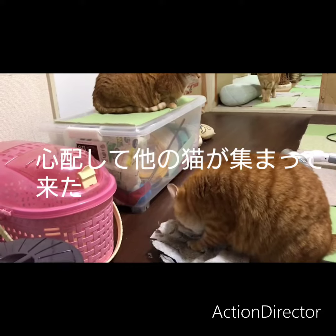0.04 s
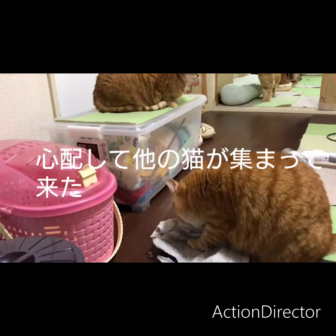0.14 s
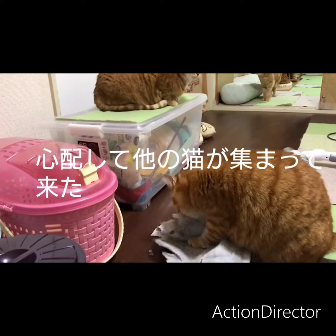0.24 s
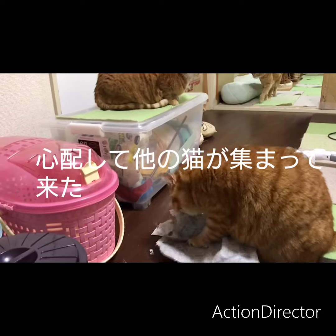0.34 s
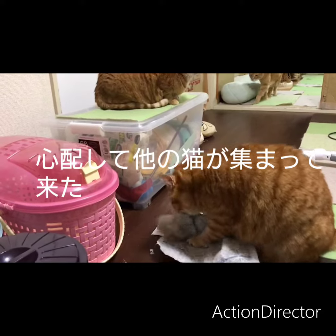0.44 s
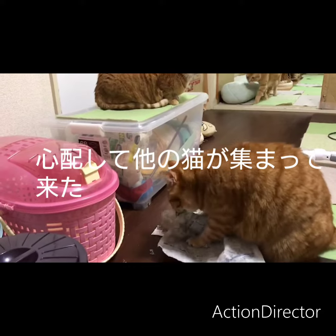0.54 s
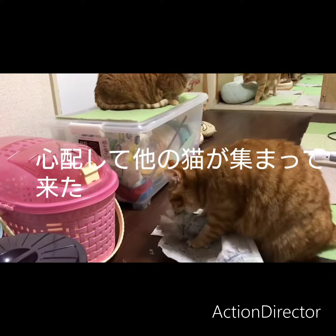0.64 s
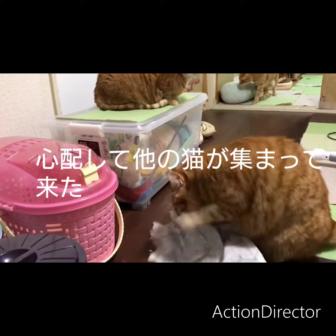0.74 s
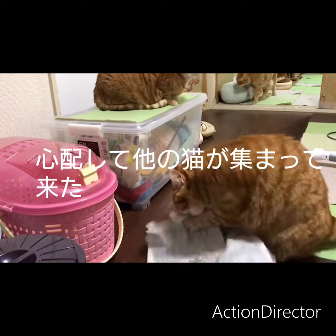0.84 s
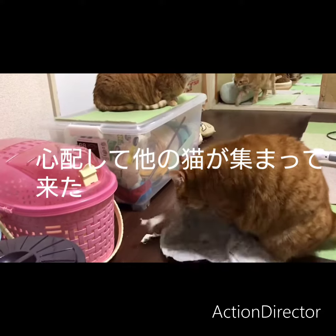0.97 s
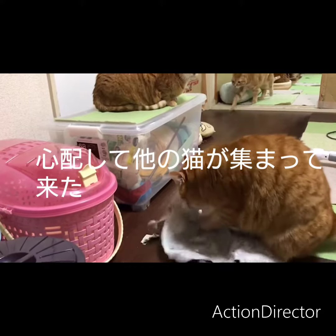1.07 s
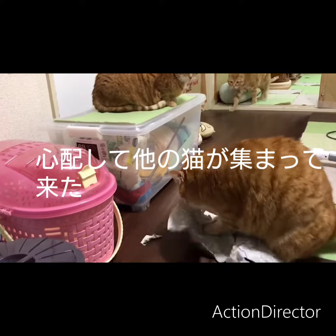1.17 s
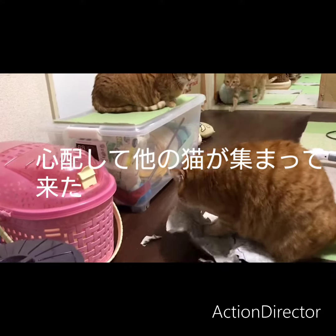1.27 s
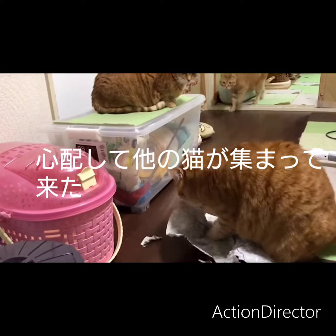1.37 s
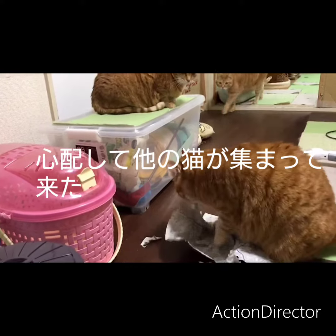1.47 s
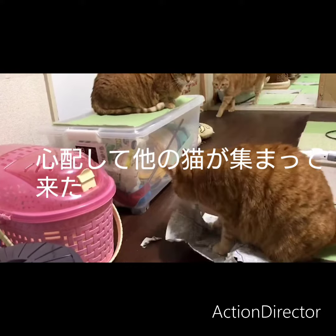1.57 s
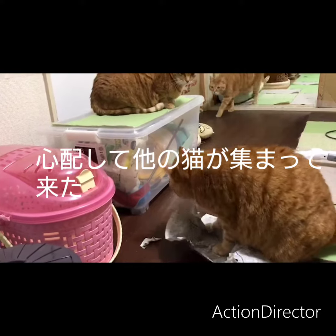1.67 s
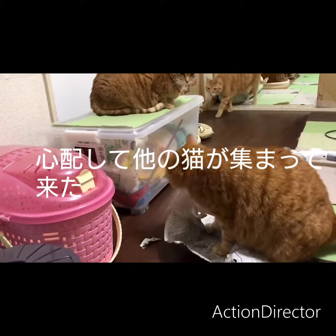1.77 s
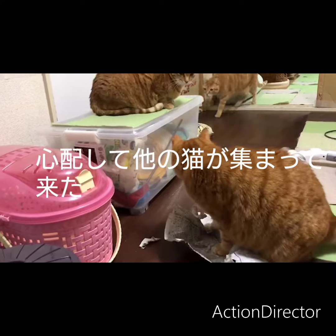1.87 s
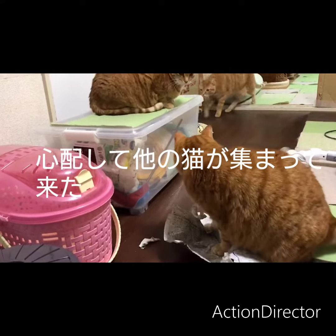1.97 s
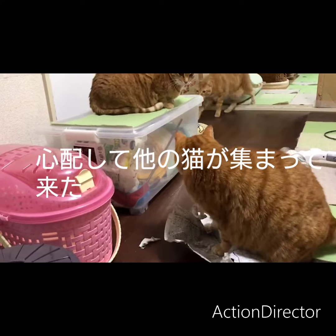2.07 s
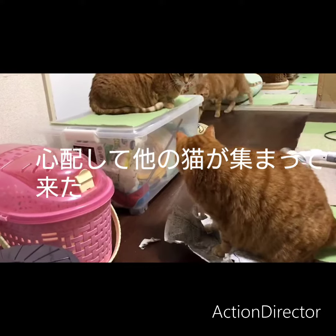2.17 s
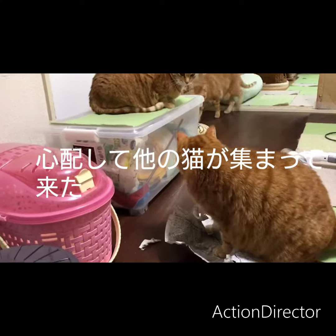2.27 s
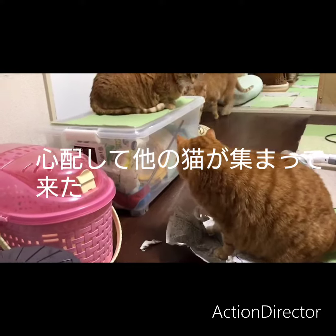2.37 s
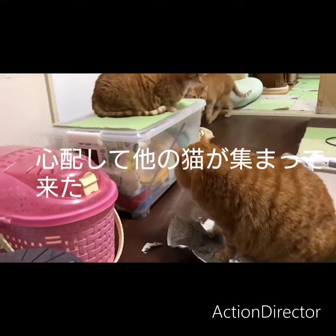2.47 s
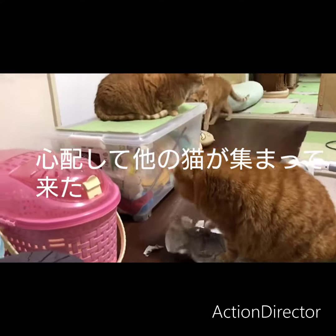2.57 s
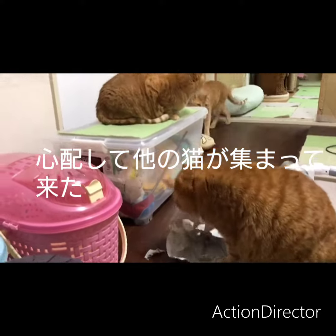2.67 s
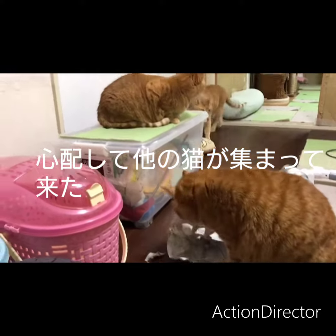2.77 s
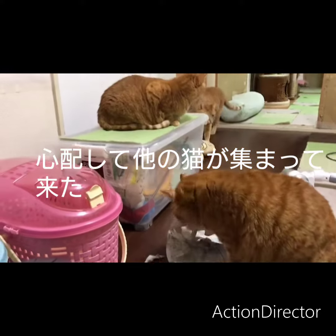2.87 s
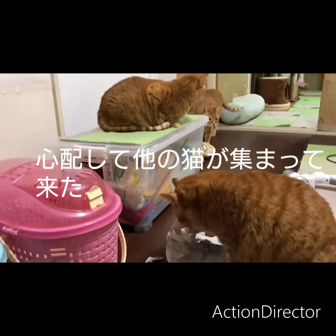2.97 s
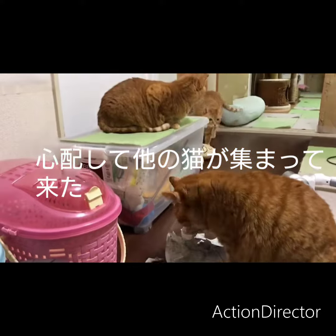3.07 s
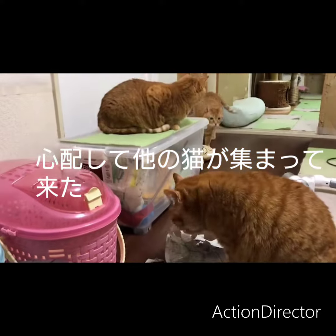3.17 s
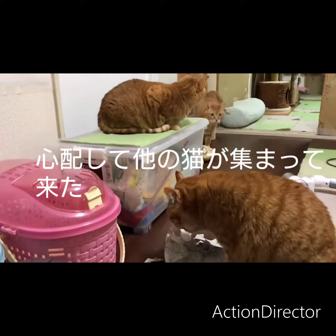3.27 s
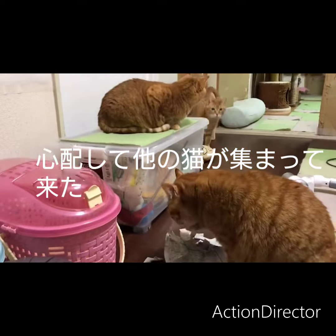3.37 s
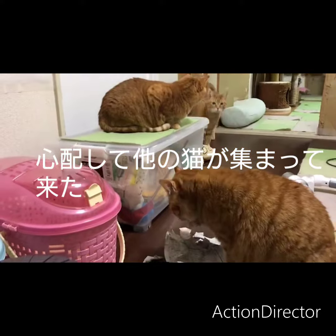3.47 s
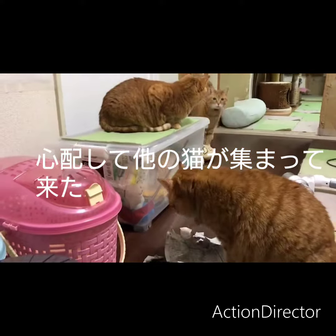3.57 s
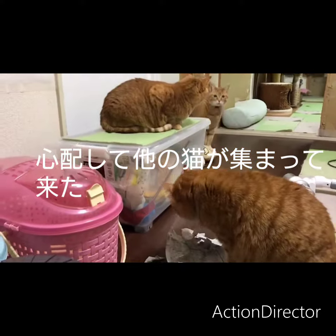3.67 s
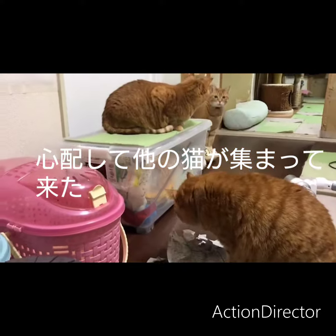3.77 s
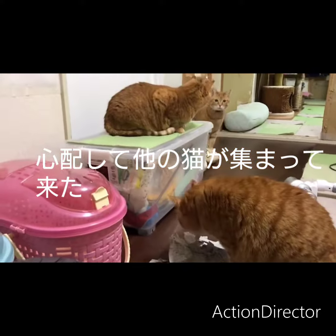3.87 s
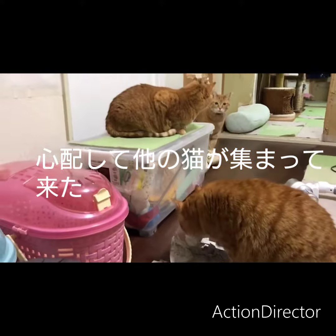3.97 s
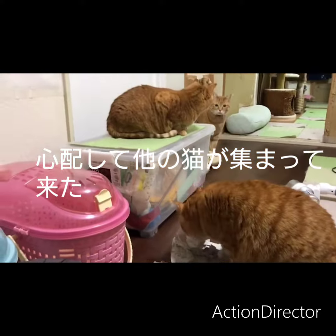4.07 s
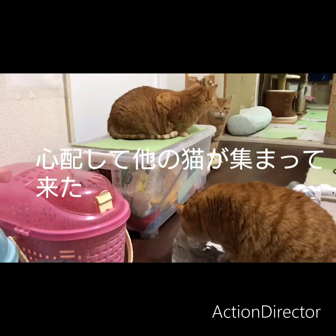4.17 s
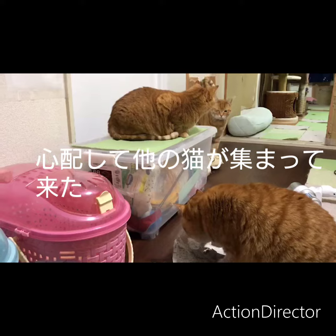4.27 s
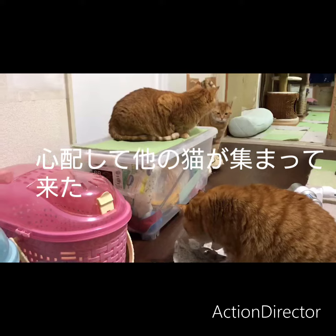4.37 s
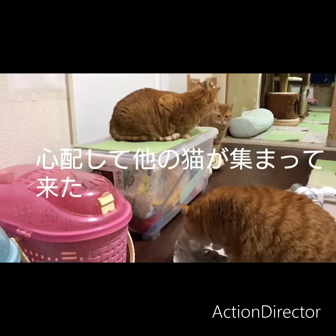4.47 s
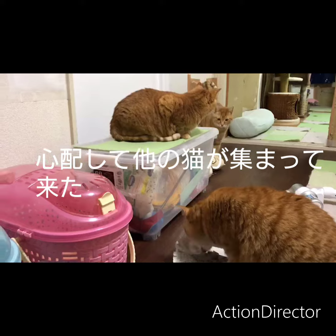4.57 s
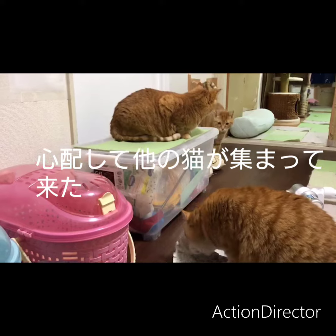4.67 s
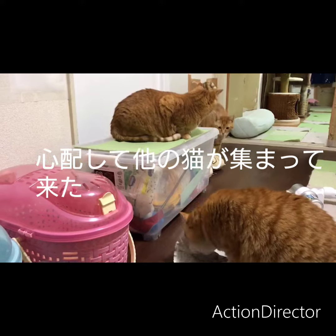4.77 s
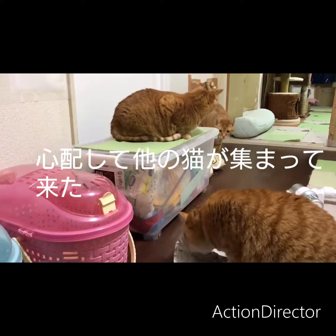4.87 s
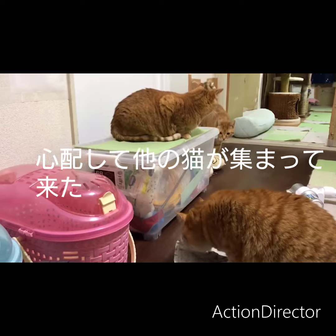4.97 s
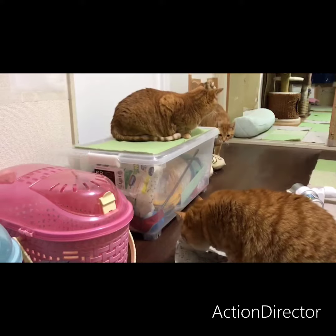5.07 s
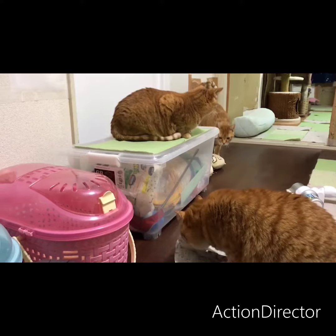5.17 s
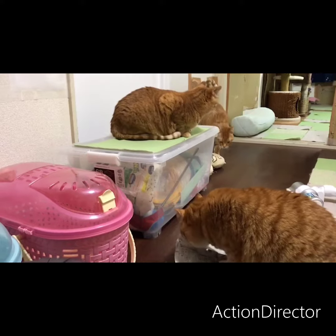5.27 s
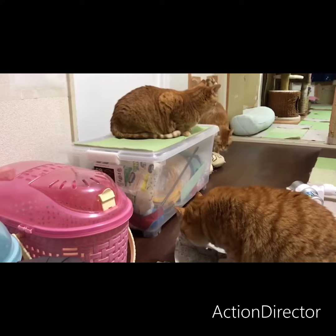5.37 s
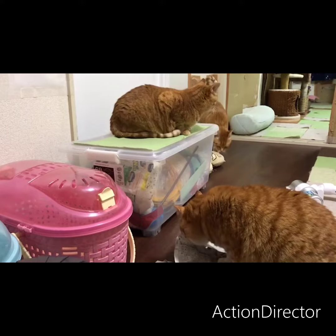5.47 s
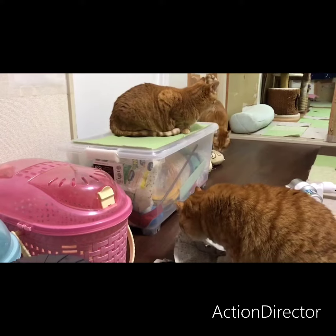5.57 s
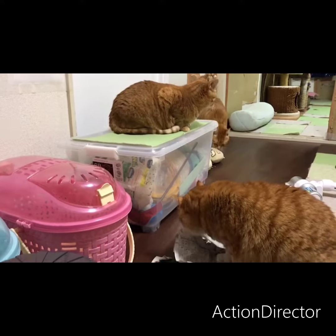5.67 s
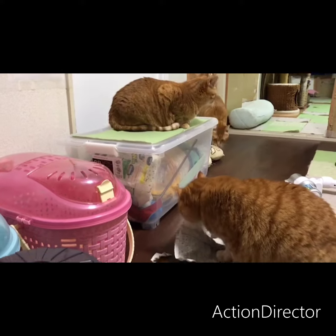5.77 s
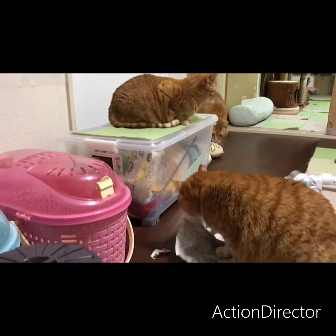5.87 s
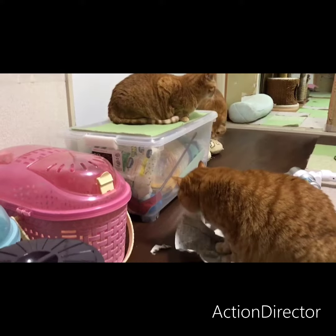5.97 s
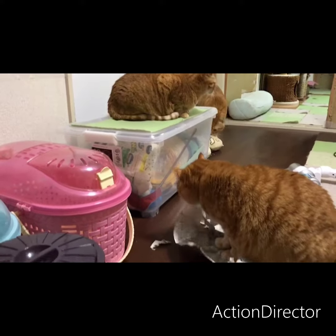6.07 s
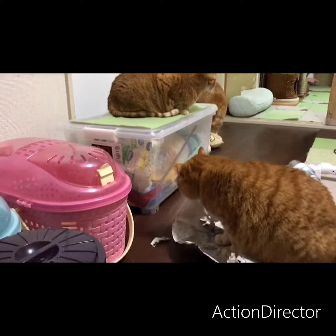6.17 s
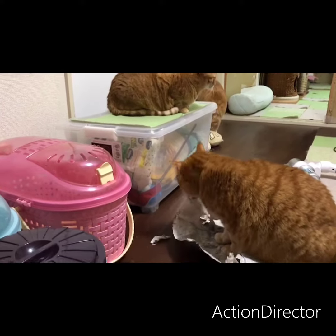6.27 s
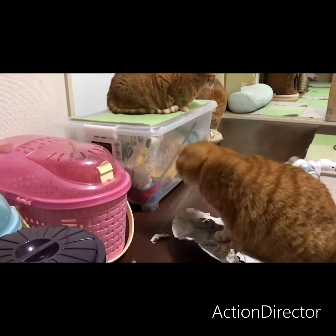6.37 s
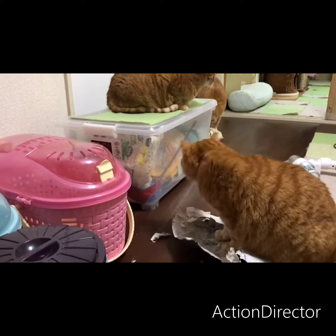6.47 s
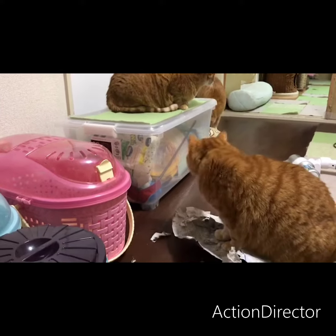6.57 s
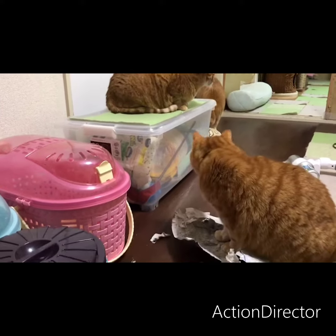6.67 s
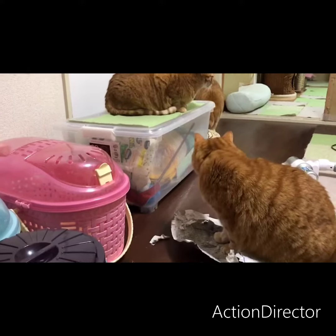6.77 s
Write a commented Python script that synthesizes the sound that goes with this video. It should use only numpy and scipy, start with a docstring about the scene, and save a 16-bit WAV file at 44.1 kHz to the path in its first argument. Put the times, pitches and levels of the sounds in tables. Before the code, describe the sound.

Newspaper rips and crumples sharply in uneven bursts close by, then quiet shuffling, soft paw thuds and two small clicks in a small room.

```python
"""A newspaper rips and crumples at once, torn by a cat on the wooden floor of a small room.
Then the cat noses at the sheet and shuffles it about, with soft paw thuds and two sharp clicks.
Clumped clicks and noise make the tearing and sliding; smeared impulses make single crease snaps.
Noise through resonances makes the thuds, damped resonances make the clicks.
Short noise tails answer as the room, over a faint rumble and hiss."""
import sys
import numpy as np
from scipy import signal
from scipy.fft import irfft
from scipy.io import wavfile
from scipy.ndimage import uniform_filter1d

SR = 44100
rng = np.random.default_rng(int(sys.argv[2]) if len(sys.argv) > 2 else 0)


def bounce(signal):
    """Save signal as a 16-bit WAV file at the path given by the first command-line argument."""
    frames = np.transpose(np.atleast_2d(signal))
    limited = np.clip(frames, -1, 1)
    pcm = np.round(limited * 32767).astype(np.int16)
    wavfile.write(sys.argv[1], SR, pcm)


N = 300762   # length in samples

# Pulls that rip the sheet: start t/s, swell t/s, hold t/s, relative crackle level/dB,
# flapping re crackle level/dB, fibre hiss re crackle level/dB
RIPS = [(0, 0.001, 0.03, -52, -8, -5), (.05, .02, 0.099, -60, -4, 2), (.217, 0.044, 0.037, -45, 2, -0.5),
        (.33, 0.017, 0.018, -45.5, 7.5, 3.5), (.38, 0.068, 0.048, -43, 0.5, 5),
        (.48, 0.034, 0.035, -36, -4, 2.5), (.56, .02, 0.039, -40.5, -4, 1),
        (.65, 0.086, 0.042, -45, -13, 0.5), (.84, 0.051, 0.033, -38.5, -6, 1),
        (.94, 0.025, 0.13, -48.5, -4.5, -2), (1.06, 0.036, 0.051, -36, -6.5, 3),
        (1.18, 0.029, 0.056, -57.5, -6, -4)]
# Nudges that slide the sheet over the floor: start t/s, swell t/s, hold t/s, relative crackle level/dB,
# flapping re crackle level/dB, fibre hiss re crackle level/dB
NUDGES = [(1.29, 0.041, 0.033, -57.5, 0, 6.5), (1.36, 0.049, 0.044, -47, -4.5, 7.5),
          (1.48, 0.028, 0.033, -52, -4.5, -1.5), (1.57, 0.026, 0.066, -60.5, -6, -4),
          (1.645, .02, .02, -47, -1.5, 2.5), (1.7, 0.013, 0.048, -61.5, -6, -5),
          (1.87, 0.095, 0.021, -66, -6, -1), (2.49, 0.04, 0.022, -64.5, -8, 5.5),
          (2.57, 0.016, 0.026, -62, -2.5, -1), (2.8, .06, .02, -76, -5, 6),
          (2.89, 0.0093, .03, -59.5, -7, -12), (2.94, .01, .04, -67, -4, -15),
          (4.35, .012, .02, -67, -8, -3), (4.615, .01, .035, -67.5, -9, -6),
          (4.69, 0.048, 0.057, -70, -6, 4), (4.853, 0.0086, .006, -64, -10, 9),
          (4.96, .06, 0.023, -68, -11, 7), (5.07, .02, .05, -75, -3, 3.5),
          (5.52, 0.012, .03, -74.5, -14, 9), (5.6, 0.019, .025, -66, -17, 3.5),
          (5.683, 0.0036, 0.14, -65.5, -12, 3.5), (5.78, 0.069, 0.049, -51, -4, 1.5),
          (6.023, 0.0098, 0.059, -49.5, -3, 4), (6.1, .02, 0.037, -54, -12, 1),
          (6.22, 0.026, .03, -73, -5, 7.5), (6.406, 0.0028, 0.0061, -63.5, -9, 9),
          (6.44, .02, 0.047, -79.5, -1, 5)]
# Colour of torn paper: f/Hz, level per Hz/dB
TEAR_COLOUR = [(55, -5.5), (130, -8), (248, -2), (360, 0.5), (475, -8), (600, -4), (830, -9), (1400, -7),
               (2150, -12.5), (3700, -6.5), (6300, -7), (9700, -12.5), (10500, -12), (15500, -19.5)]
# Colour of paper sliding on the floor: f/Hz, level per Hz/dB
SLIDE_COLOUR = [(60, -14), (215, -2.5), (285, -9), (475, -12), (640, 1.5), (810, -7.5), (1400, -7),
                (2500, -6.5), (3100, -8), (4200, -7.5), (5700, -11.5), (7000, -10), (10500, -15),
                (15500, -18.5)]
# Zones of flapping, crackle and fibre hiss: low f/Hz, high f/Hz
PAPER_ZONES = [(50, 700), (700, 4000), (4000, 16000)]
# Creases that buckle: t/s, pitch f/Hz, relative crack level/dB, flap re crack level/dB,
# fibre hiss re crack level/dB
CREASES = [(0.0468, 7800, -44.5, -24, -1.5), (0.0654, 1150, -50, -9, -19), (.076, 3770, -53, 0, -8),
           (0.0936, 1670, -44.5, -1, -15), (0.1709, 1510, -42.5, -17, -21), (.203, 1530, -49, -22, -11),
           (0.2163, 1090, -38, 2.5, -19), (.2218, 3060, -34.5, -28, -6.5), (0.2435, 3250, -42, -14, -4),
           (0.251, 1640, -35, -5, -12.5), (0.2623, 990, -37, -25, -6), (0.2814, 1200, -32.5, 0, -6.5),
           (.2876, 1260, -41, -2, 3.5), (0.3073, 5210, -44, -15, 3), (.33, 1620, -42, 14, 12.5),
           (.354, 3790, -40, -17, 7.5), (0.4172, 5750, -46, 12, 8), (.4302, 5060, -37.5, -10, -4),
           (0.4698, 1540, -32.5, -4, -1.5), (.5026, 1480, -37.5, 4, 3), (.5737, 3100, -42.5, 7.5, 10.5),
           (.611, 6240, -42, -20, 0), (0.6952, 1620, -47.5, 3, 3.5), (0.764, 6900, -46.5, -6, 8.5),
           (0.8, 695, -41.5, -1.5, -13), (0.8835, 1060, -34.5, -2.5, 1), (.896, 3700, -34.5, -2.5, -5),
           (0.9761, 4030, -37.5, -27, -12), (.988, 970, -40, -3, -16), (1.0057, 686, -48, 16, -7),
           (1.0174, 5850, -32.5, -32, 3), (1.0427, 3940, -35.5, -12, -3), (1.07, 4430, -34.5, -12, 0),
           (1.088, 1470, -31.5, -0.5, -10), (1.0957, 1000, -30.5, -14, -27), (1.117, 4670, -38.5, -2, 5),
           (1.121, 8900, -44, -20, 16), (1.1376, 706, -42, 10, -7), (1.1679, 2920, -35, -20, 0),
           (1.3724, 4000, -52, -2, 9.5), (1.448, 6100, -43.5, -4, 7), (1.532, 1700, -44, -25, -27),
           (2.473, 706, -67, 9.5, 2), (2.585, 4030, -52.5, -6, -5), (2.654, 1200, -59, -0.5, -14),
           (2.7967, 2290, -48.5, -18, -29), (2.8948, 3650, -58.5, -3, -2), (4.186, 500, -71.5, 10, -15),
           (4.228, 1100, -67, -1, -17), (4.3329, 1900, -53.5, 0, -5), (4.358, 1330, -56.5, -3, 1),
           (4.5166, 815, -56, -13, -23), (4.5355, 1080, -52, -15, -0.5), (4.6171, 2330, -60.5, -3, -1.5),
           (4.6456, 1230, -55, -7.5, -28), (5.0758, 1180, -61, -2.5, -12), (5.366, 6000, -72, -6, 7),
           (5.684, 3500, -51, -18, -5), (5.7774, 2510, -52, -27, 2), (5.7945, 6000, -59.5, -20, 7),
           (5.8043, 7150, -53, -17, 6.5), (5.8884, 3530, -46, -21, -12), (6.026, 2550, -46.5, -3.5, 6),
           (6.0818, 3470, -43.5, -24, -7), (6.1353, 2700, -48, -15, -8)]
# Colour of one crease: f/Hz, level per Hz/dB
CREASE_COLOUR = [(100, -3), (350, 4.5), (900, 0.5), (1500, -0.5), (2300, -3.5), (3600, -6.5), (4800, -6),
                 (5400, -6.5), (6100, -5.5), (7500, -10), (10500, -13.5), (15500, -17.5)]
# Soft paw steps on the boards: t/s, relative level/dB, pitch f/Hz
PAW_STEPS = [(1.667, -56, 202), (1.965, -55, 158), (2.894, -50.5, 185), (3.311, -56, 200),
             (6.029, -58, 215)]
# Sharp clicks, probably teeth closing on the paper: t/s, level/dB, thinned below f/Hz, dulled above f/Hz
BITES = [(3.314, -38.5, 150, 4500), (3.7074, -48, 800, 2000)]
# What a bite rings with: f/Hz, width f/Hz, relative level/dB
BITE_MODES = [(276, 230, -4.5), (915, 240, -1), (1400, 400, -4.5), (2260, 520, 1), (3520, 1200, -8),
              (4620, 570, -2.5), (6200, 500, -5.5), (6800, 700, -9), (10500, 5000, -21)]
# Hollow ring of the boxes and the corner beside the cat: f/Hz, width f/Hz, level/dB
CORNER_MODES = [(243, 10, -9.5), (347, 20, -12.5), (633, 23.6, 2), (1010, 24.3, -3), (1357, 7.3, -2),
                (1570, 19.3, -13), (2390, 30, -14)]
# Extra echo over time, strong during the tearing, least near 2.4 s, strong again in the late shuffling:
# t/s, extra echo level/dB
ECHO_OVER_T = [(1.7, 6.5), (2.4, 2.5), (5.3, 5), (5.8, 6)]
# The room's tail: f/Hz, fall by 60 dB t/s, relative level/dB
ROOM_TAIL = [(149.7, 0.45, -4), (499, 0.41, -7), (1330, 0.45, -1), (3750, 0.39, -4.5), (6870, 0.38, -4.5),
             (14000, 0.23, 0)]
# Colour of the quiet room: f/Hz, relative level per Hz/dB
QUIET_COLOUR = [(15, -35), (25, -15), (49, 3), (69, 3.5), (173, -11.5), (349, -14), (469, -19.5),
                (1050, -19.5), (2490, -27), (4040, -26), (4870, -30), (6380, -27.5), (10400, -32.5),
                (12800, -27), (15500, -27)]

QUIET_DB = -63.5
SNAP_WINDOW_S = 0.006   # snap and bite energy is set as the rms over this time
CUTOFF_HZ = 15600
SETTLE_S, SETTLE_SHARE = 0.0083, 0.13   # settling time, plus a share of the stroke's swell and hold
FOLD_DB, FOLD_RATE_HZ = 2.5, 24   # how far and how fast the sheet's colour changes as it folds
CREASE_RIPPLE_DB = 3.5   # every crease has uneven resonances of its own
CATCH_DB, CATCH_RATE_HZ = 1.1, 45   # the paper catches and gives way unevenly within a stroke
# echo re direct sound, before the extra echo over time is added
RIP_ROOM_DB, NUDGE_ROOM_DB, CREASE_ROOM_DB, BITE_ROOM_DB = -12.5, -11.5, -6.5, -8


def from_db(db):
    """Decibels to gain."""
    return 10 ** (np.asarray(db) / 20)


def rms_one(x):
    """Scale to unit rms."""
    return x / np.sqrt(np.mean(x ** 2) + 1e-20)


def at_hz(points, hz, axis=1):
    """Read one column of a table on a log-frequency axis."""
    points = np.array(points)
    return np.interp(np.log(hz), np.log(points[:, 0]), points[:, axis])


def band(x, low, high):
    """Causal band-pass."""
    sos = signal.butter(2, [low, min(high, 0.45 * SR)], "band", fs=SR, output="sos")
    return signal.sosfilt(sos, x + 1e-18)


def slices(low, high, count):
    """Adjoining bands of equal musical width: (low, centre, high)."""
    edges = np.geomspace(low, high, count + 1)
    return zip(edges, np.sqrt(edges[:-1] * edges[1:]), edges[1:])


def drift(rate_hz, size):
    """Slow random wander with spread 1, drawn every 40 samples and joined by straight lines."""
    r = np.exp(-80 * np.pi * rate_hz / SR)
    noise = rng.standard_normal(size // 40 + 2002)
    slow = signal.lfilter([1], [1, -2 * r, r * r], noise)[2000:]   # skip the filter's start
    return np.interp(np.arange(size) / 40, np.arange(len(slow)), rms_one(slow))


def resonance(x, hz, width_hz):
    """One resonance with gain 1 on top."""
    r = np.exp(-np.pi * width_hz / SR)
    zeros = np.array([1, 0, -1]) * (1 - r * r) / 2
    return signal.lfilter(zeros, [1, -2 * r * np.cos(2 * np.pi * hz / SR), r * r], x)


def quiet_room():
    """Low rumble of the house and an even hiss."""
    noise = sum(from_db(at_hz(QUIET_COLOUR, hz)) * band(rng.standard_normal(N), low, high)
                for low, hz, high in slices(32.44, 18360, count=27))
    return from_db(QUIET_DB) * rms_one(noise)


def effort(strokes, t):
    """Each stroke swells, holds and settles; gains of flapping, crackle and fibre hiss."""
    power = np.zeros((3, len(t)))
    for start, swell, hold, level_db, flap_db, hiss_db in strokes:
        settle = SETTLE_S + SETTLE_SHARE * (swell + hold)
        rise = np.clip((t - start) / swell, 0, 1)
        fall = np.exp(-np.clip((t - start - swell - hold) / settle, 0, 20))
        zone_db = level_db + np.array([[flap_db], [0], [hiss_db]])
        power += (from_db(zone_db) * rise * fall) ** 2
    return np.sqrt(power) * from_db(CATCH_DB * drift(CATCH_RATE_HZ, len(t)))


def rustle(strokes, colour, per_s, spread_db, clump_db, octaves, friction, fineness):
    """Clumps of tiny fibre snaps, each with a pitch of its own, over the friction of sheet on sheet."""
    size = min(N, int((strokes[-1][0] + 0.5) * SR))
    t = np.arange(size) / SR
    chance = per_s * from_db(clump_db * drift(40, size)) / SR
    at = np.flatnonzero(rng.random(size) < chance)
    force = from_db(spread_db * np.minimum(rng.exponential(1, len(at)), 4))
    force *= rng.choice([-1, 1], len(at))
    # high snaps are the most common; low ones come as separate lumps
    pitch_octave = np.log2(150) + np.log2(16000 / 150) * rng.random(len(at)) ** (1 / fineness)
    out = np.zeros(N)
    for zone, gain in zip(PAPER_ZONES, effort(strokes, t)):
        part = np.zeros(size)
        for low, hz, high in slices(*zone, count=7):
            nearness = 1 / (1 + ((np.log2(hz) - pitch_octave) / octaves) ** 2)
            clicks = np.zeros(size)
            clicks[at] = force * rng.normal(0, 1, len(at)) * nearness
            # the folds shift, so the sheet favours other pitches from moment to moment
            colour_db = at_hz(colour, hz) + FOLD_DB * drift(FOLD_RATE_HZ, size)
            grains = rms_one(clicks) + friction * rng.standard_normal(size)
            part += from_db(colour_db) * band(grains, low, high)
        # even out the energy, so the pull of the cat sets how much is let go
        part /= np.sqrt(np.abs(uniform_filter1d(part ** 2, int(0.0237 * SR))) + 1e-12)
        out[:size] += part * gain
    return out


def sheet_scatter(x, share):
    """Bending waves bounce between the folds and smear each click: three all-pass loops."""
    share = np.clip(share, 0.1, 0.75)
    for lag in (11, 23, 41):   # samples
        loop = np.r_[1, np.zeros(lag - 1), -share]
        x = signal.lfilter(loop[::-1], loop, x)
    return x


def crease_snaps(buckle_s, cycles, pitch_db, octaves, dulling, size=2048):
    """A crease gives way at once; the sheet delays each frequency differently, the low ones most."""
    times, pitches, crack_db, flap_db, hiss_db = np.transpose(CREASES)[:, :, None]
    levels = crack_db + flap_db, crack_db, crack_db + hiss_db
    hz = np.maximum(np.fft.rfftfreq(size, 1 / SR), 1)
    chance = rng.standard_normal((len(times), len(hz)))
    path = np.abs(rms_one(uniform_filter1d(chance, size=36)))
    delay_s = (buckle_s + cycles / np.maximum(hz, 200)) * (0.256 + path)
    phase = 2 * np.pi * np.cumsum(delay_s, axis=1) * SR / size   # delay summed over frequency
    # the facet beside the crease favours one pitch
    facet_db = pitch_db / (1 + (np.log2(hz / pitches) / octaves) ** 2)
    ripple = uniform_filter1d(rng.standard_normal(path.shape), size=20)
    facet_db += CREASE_RIPPLE_DB * rms_one(uniform_filter1d(ripple, size=20))
    # a soft crease, with little hiss for its crack, also falls off faster above 4 kHz
    soft_db = dulling * np.minimum(hiss_db, 0) * np.maximum(np.log2(hz / 4000), 0)
    spectrum = from_db(at_hz(CREASE_COLOUR, hz) + facet_db + soft_db) * np.exp(-1j * phase)
    clicks = irfft(spectrum)
    clicks[:, size // 2:] = 0
    waves = 0
    for zone, level_db in zip(PAPER_ZONES, levels):
        part = band(clicks, *zone)
        energy = np.linalg.norm(part, axis=1)[:, None]
        # neighbouring zones take opposite polarity
        waves = part * from_db(level_db) * np.sqrt(SNAP_WINDOW_S * SR) / energy - waves
    out = np.zeros(N)
    for at, wave in zip((times[:, 0] * SR).astype(int), waves):
        out[at:at + size] += wave
    return out


def corner(x):
    """A few narrow resonances that stay put while the paper moves."""
    return sum(from_db(level_db) * resonance(x, hz, width_hz) for hz, width_hz, level_db in CORNER_MODES)


def room(x, first_echo_s, build_s):
    """Dense reflections that build up after the direct sound and die soonest at the very top."""
    t = np.arange(SR // 2) / SR
    tail = 0
    for low, hz, high in slices(81.5, 17330, count=14):
        fall_db = at_hz(ROOM_TAIL, hz, axis=2) - 60 * t / at_hz(ROOM_TAIL, hz)
        tail = tail + from_db(fall_db) * band(rng.standard_normal(len(t)), low, high)
    tail *= np.clip((t - first_echo_s) / build_s, 0, 1)
    return signal.fftconvolve(x, tail / np.sqrt(np.sum(tail ** 2)))[:N]


def paws(press_s, width_hz):
    """A padded foot loads the boards slowly and they answer with a dull thud."""
    out, age = np.zeros(N), np.arange(SR // 4) / SR / press_s
    for s, level_db, hz in PAW_STEPS:
        noise = rng.standard_normal(len(age))
        boards = rms_one(resonance(resonance(noise, hz, width_hz), hz, width_hz))
        at = int(s * SR)
        out[at:at + len(age)] += from_db(level_db) * boards * age * np.exp(-age)
    return out


def bites(crunch):
    """A click, smeared by the folded paper, sets off broad, quickly damped resonances."""
    out = np.zeros(N)
    click = sheet_scatter(sheet_scatter(signal.unit_impulse(SR // 20), crunch), crunch)
    for s, level_db, thin_hz, dull_hz in BITES:
        wave = sum(from_db(db) * resonance(click, hz, width_hz) * (-1) ** k   # polarity alternates
                   for k, (hz, width_hz, db) in enumerate(BITE_MODES))
        wave = band(wave, thin_hz, CUTOFF_HZ)
        wave = signal.lfilter(*signal.butter(1, min(dull_hz, SR / 3), fs=SR), wave)
        at = int(s * SR)
        gain = from_db(level_db) * np.sqrt(SNAP_WINDOW_S * SR) / np.linalg.norm(wave)
        out[at:at + len(wave)] += gain * wave
    return out


def scene():
    """The paper and the cat close by, their echo and the background."""
    tearing = from_db(-0.74) * rustle(RIPS, TEAR_COLOUR, per_s=800, spread_db=3.2, clump_db=4.0,
                                      octaves=0.78, friction=0.5, fineness=1.46)
    shuffling = from_db(-1.1) * rustle(NUDGES, SLIDE_COLOUR, per_s=1400, spread_db=3.5, clump_db=3.5,
                                       octaves=0.89, friction=0.62, fineness=1.35)
    creases = from_db(-3.5) * crease_snaps(buckle_s=0.0013, cycles=0.5536, pitch_db=9,
                                           octaves=0.25, dulling=0.55)
    sources = [(sheet_scatter(tearing, share=0.52), RIP_ROOM_DB),
               (creases, CREASE_ROOM_DB),
               (sheet_scatter(shuffling, share=0.54), NUDGE_ROOM_DB),
               (bites(crunch=0.36), BITE_ROOM_DB)]
    # the paw thuds get the corner's ring but no echo
    direct = sum(sound for sound, _ in sources) + paws(press_s=0.023, width_hz=81)
    extra_echo_db = np.interp(np.arange(N) / SR, *np.transpose(ECHO_OVER_T))
    # each source reaches the walls by paths of its own
    echo = sum(room(from_db(extra_echo_db + room_db) * sound, first_echo_s=0.00033, build_s=0.00067)
               for sound, room_db in sources)
    return (direct + corner(direct) + echo + quiet_room())[None]


def record(dry):
    """The top is cut steeply by an elliptic low-pass."""
    return signal.sosfilt(signal.ellip(12, 0.1, 70, CUTOFF_HZ, fs=SR, output="sos"), dry)


dry = scene()
out = record(dry)
bounce(out)
```